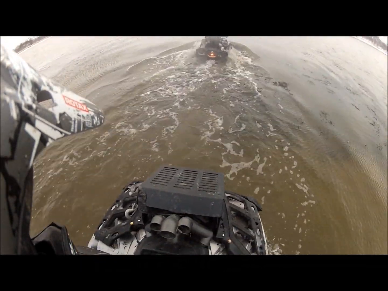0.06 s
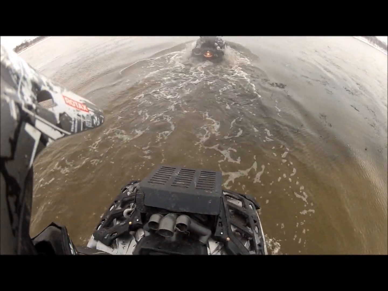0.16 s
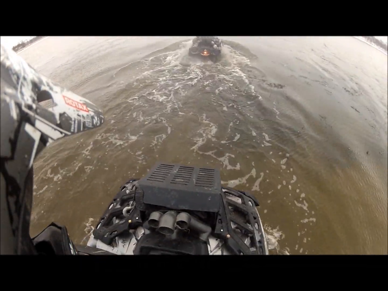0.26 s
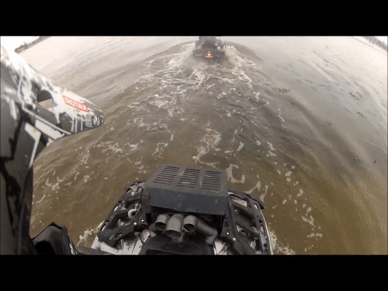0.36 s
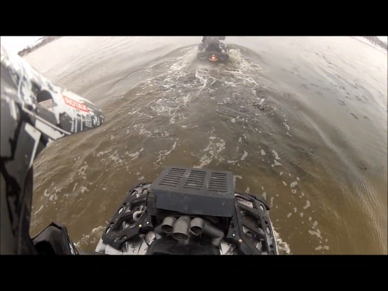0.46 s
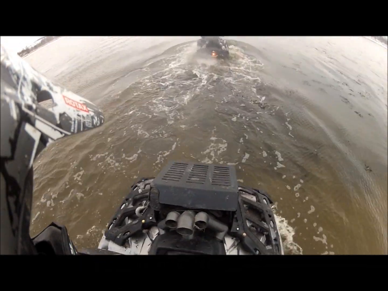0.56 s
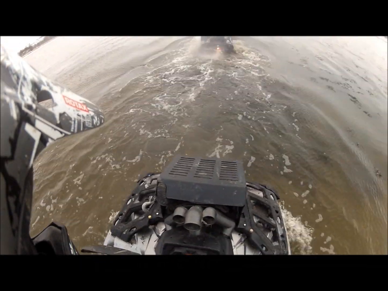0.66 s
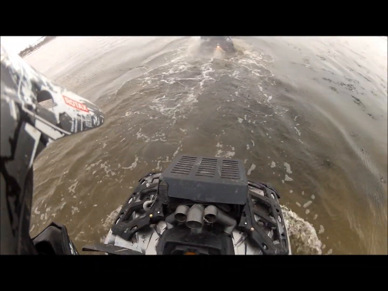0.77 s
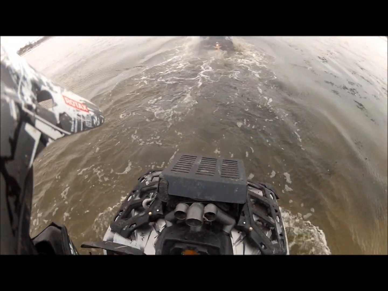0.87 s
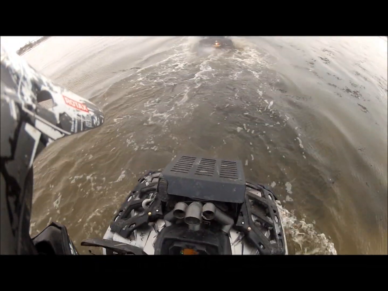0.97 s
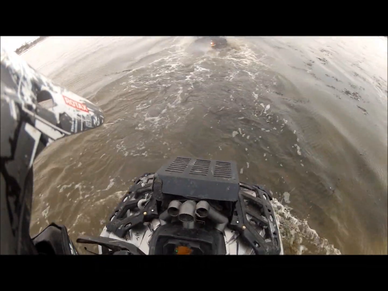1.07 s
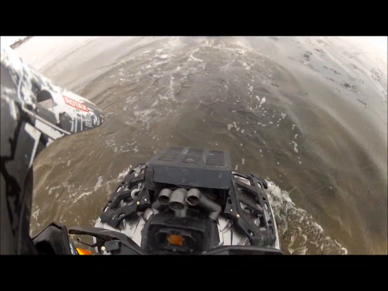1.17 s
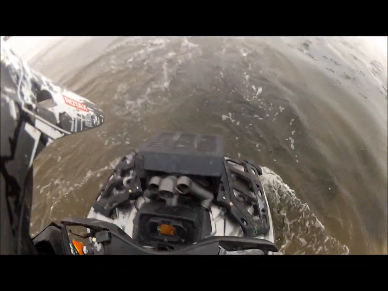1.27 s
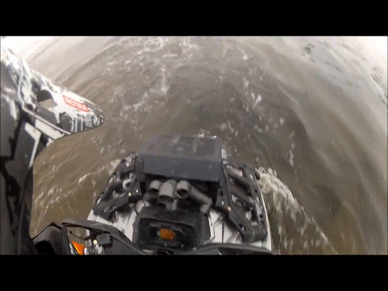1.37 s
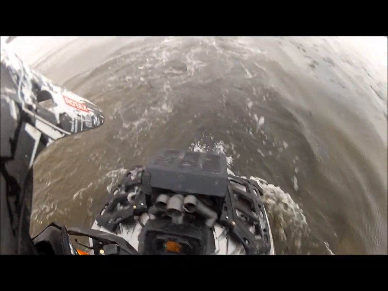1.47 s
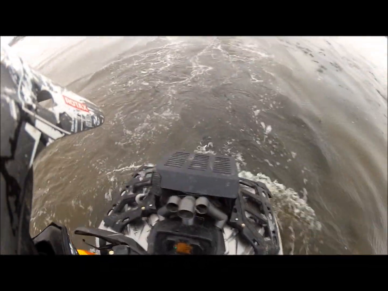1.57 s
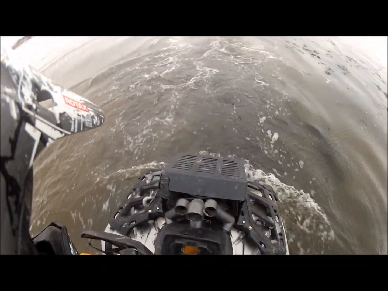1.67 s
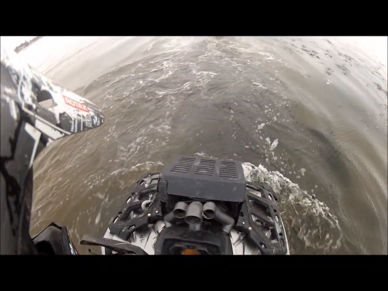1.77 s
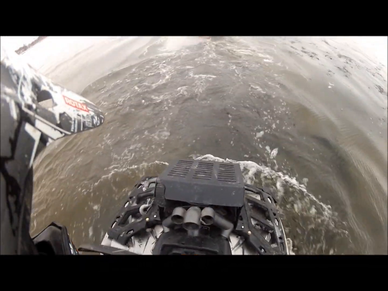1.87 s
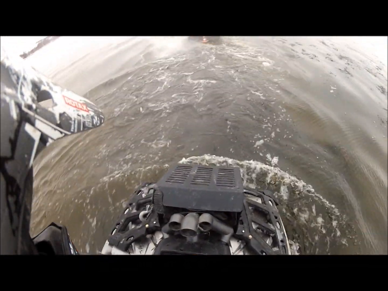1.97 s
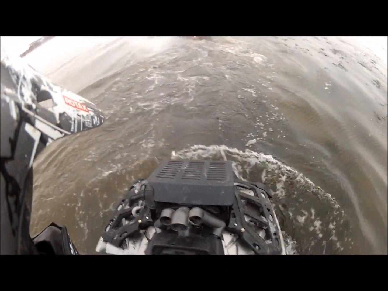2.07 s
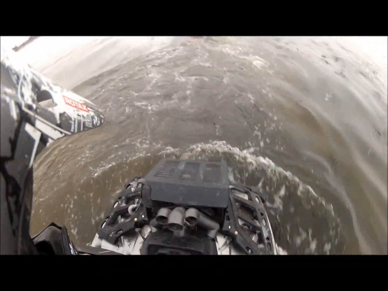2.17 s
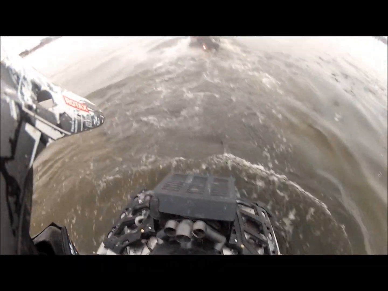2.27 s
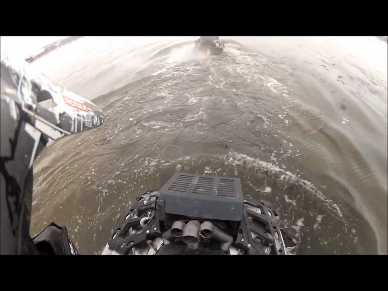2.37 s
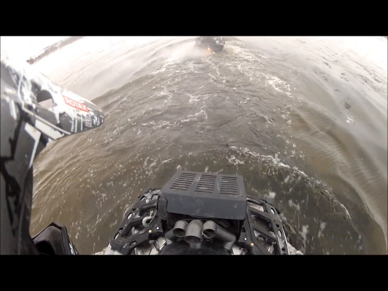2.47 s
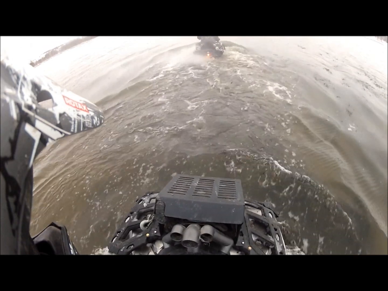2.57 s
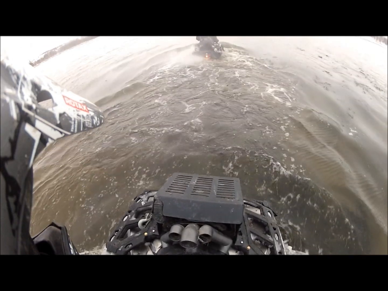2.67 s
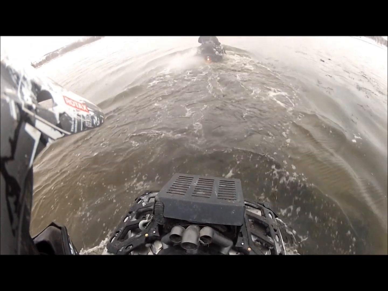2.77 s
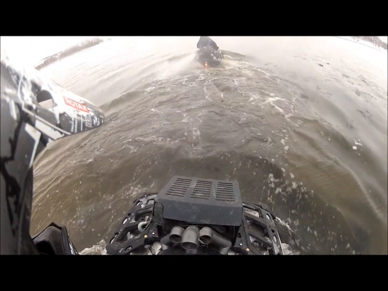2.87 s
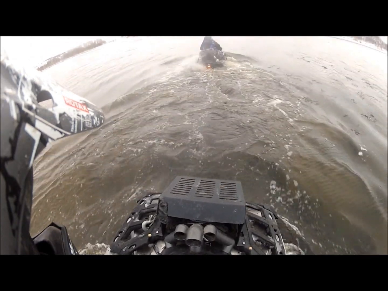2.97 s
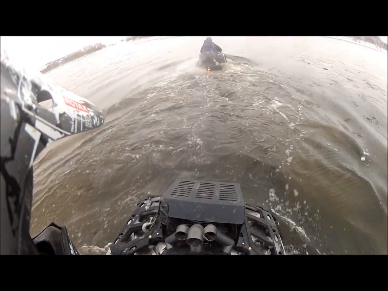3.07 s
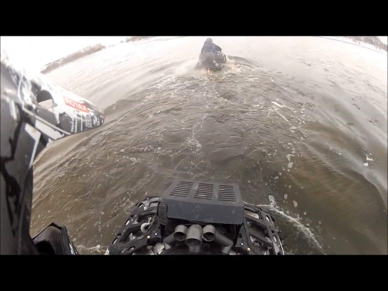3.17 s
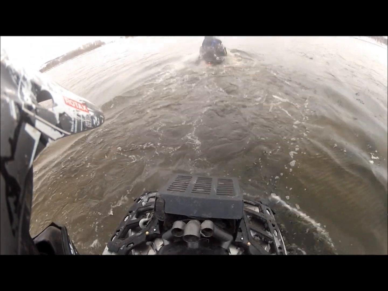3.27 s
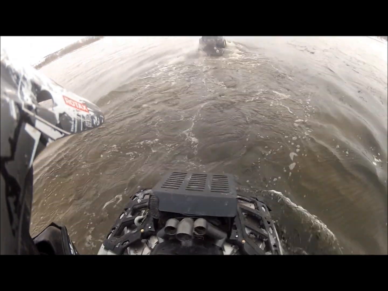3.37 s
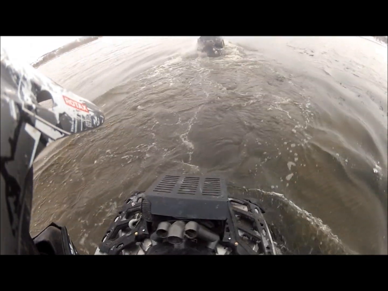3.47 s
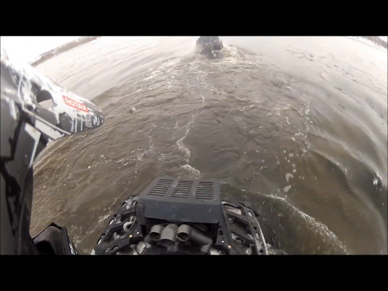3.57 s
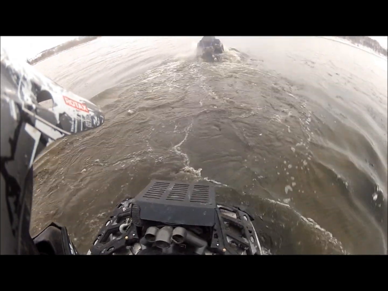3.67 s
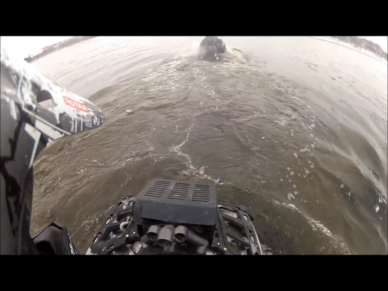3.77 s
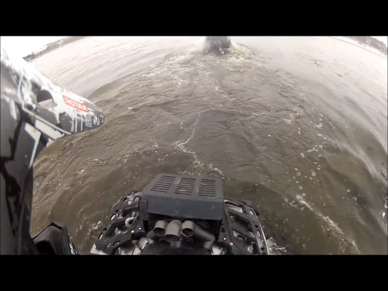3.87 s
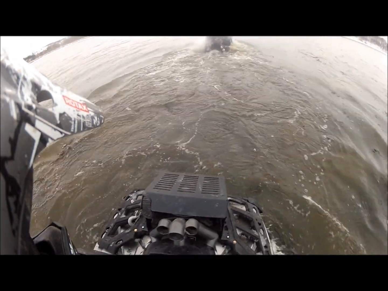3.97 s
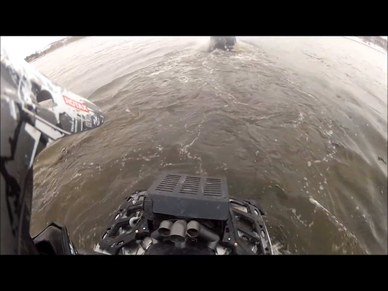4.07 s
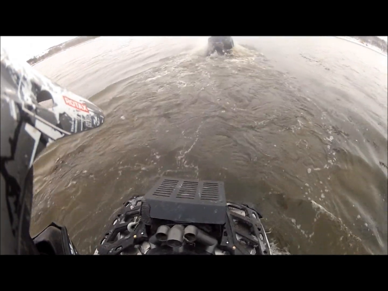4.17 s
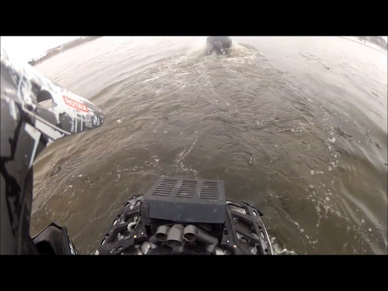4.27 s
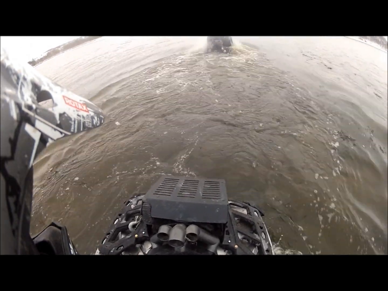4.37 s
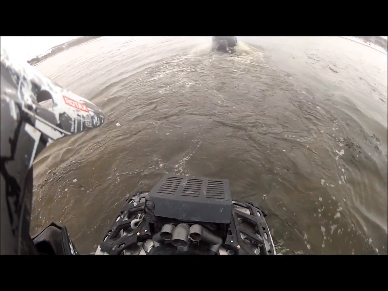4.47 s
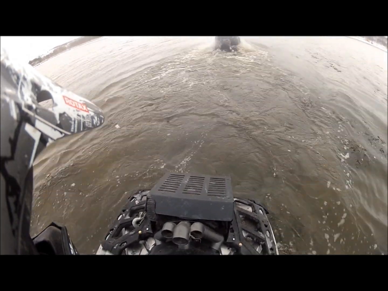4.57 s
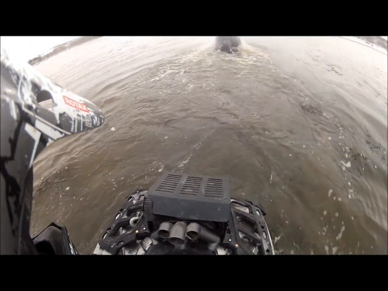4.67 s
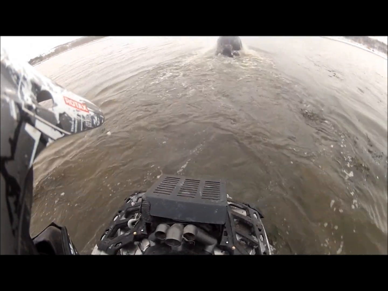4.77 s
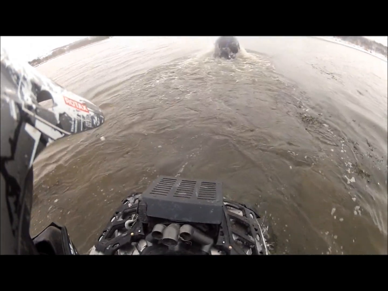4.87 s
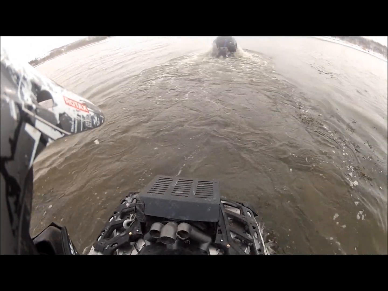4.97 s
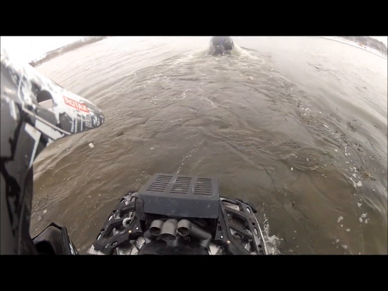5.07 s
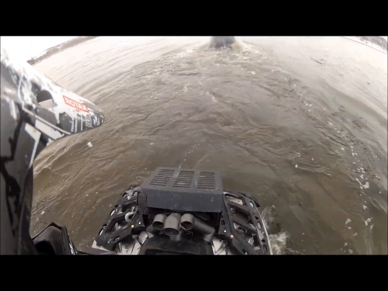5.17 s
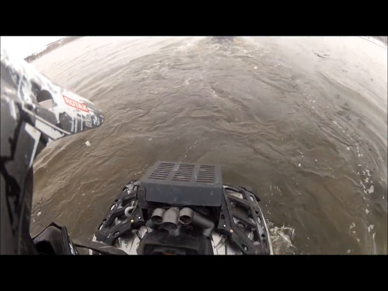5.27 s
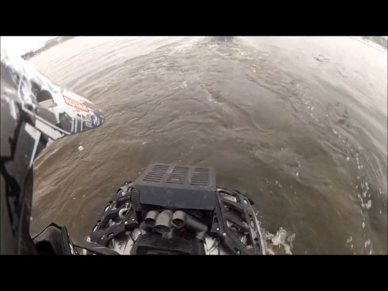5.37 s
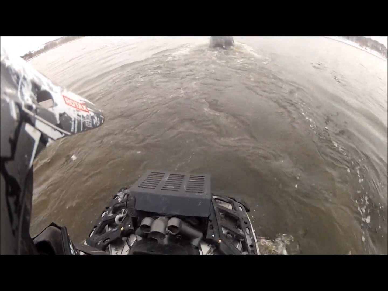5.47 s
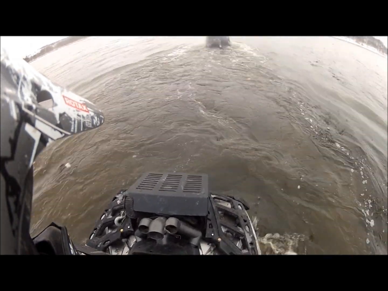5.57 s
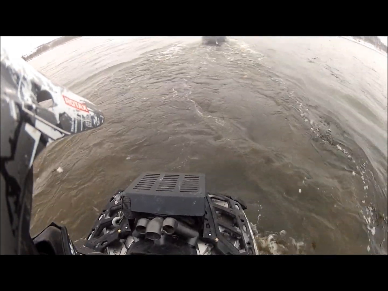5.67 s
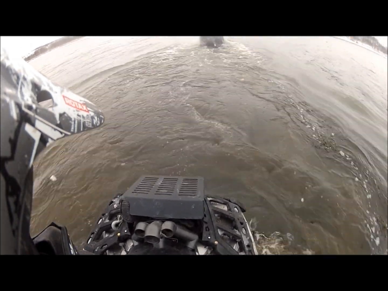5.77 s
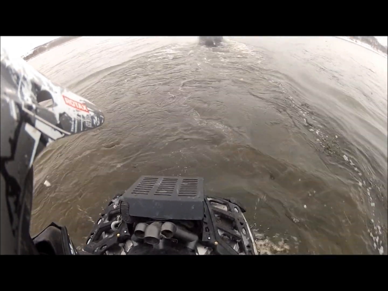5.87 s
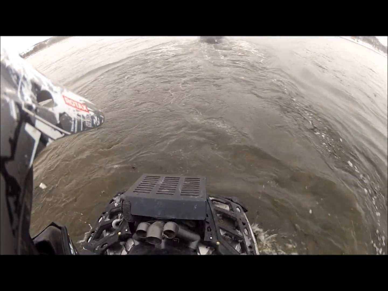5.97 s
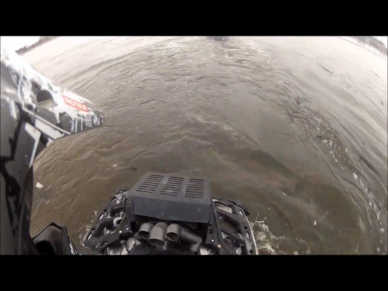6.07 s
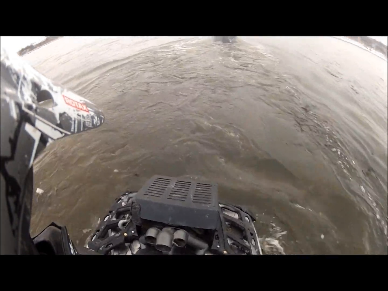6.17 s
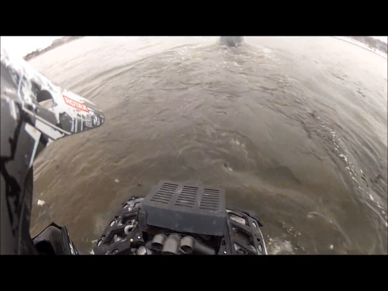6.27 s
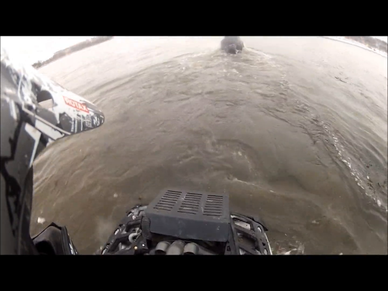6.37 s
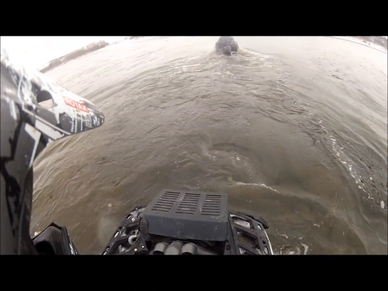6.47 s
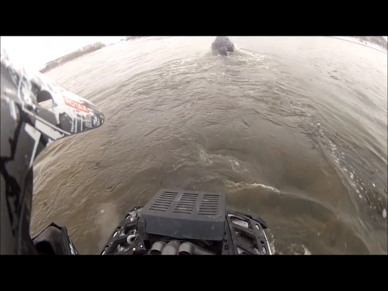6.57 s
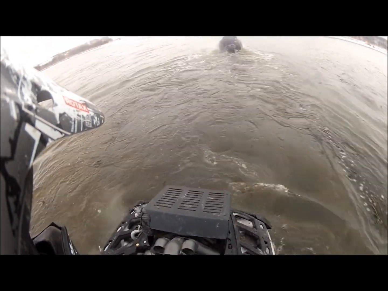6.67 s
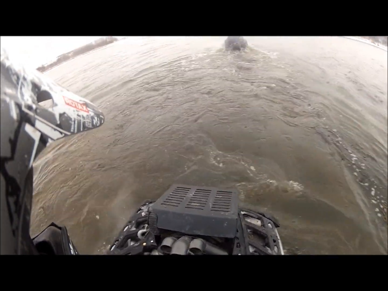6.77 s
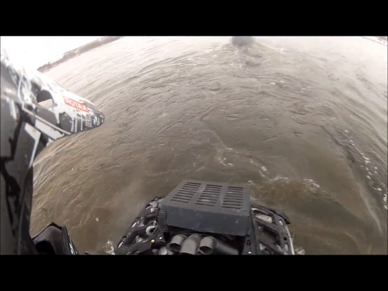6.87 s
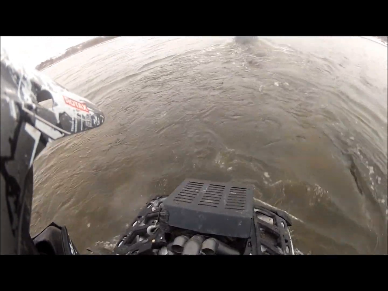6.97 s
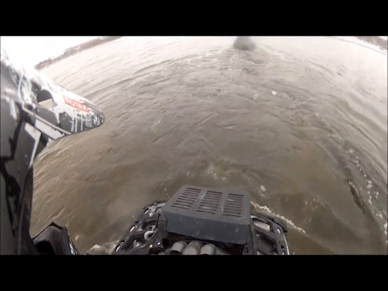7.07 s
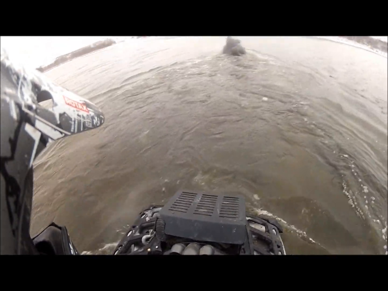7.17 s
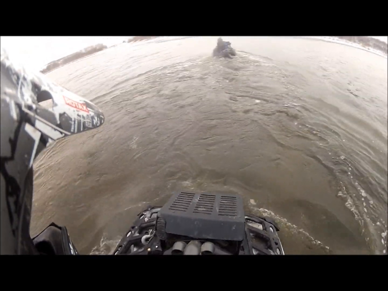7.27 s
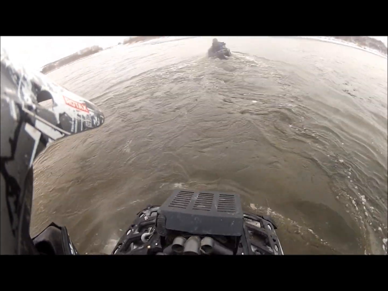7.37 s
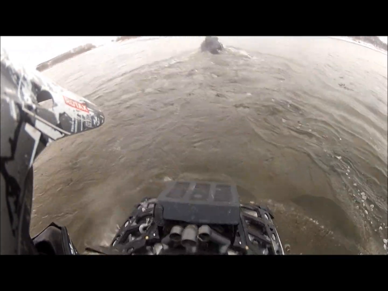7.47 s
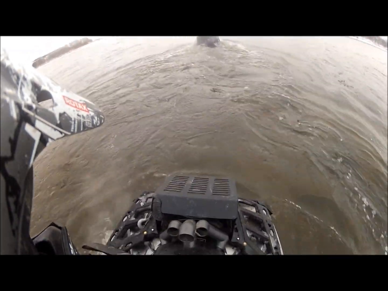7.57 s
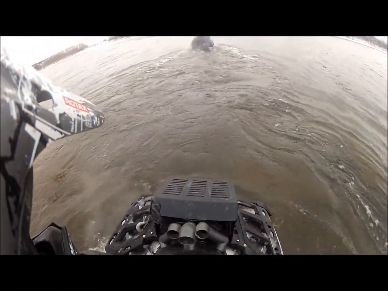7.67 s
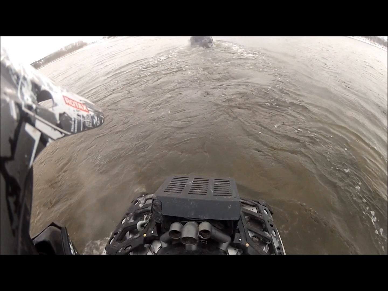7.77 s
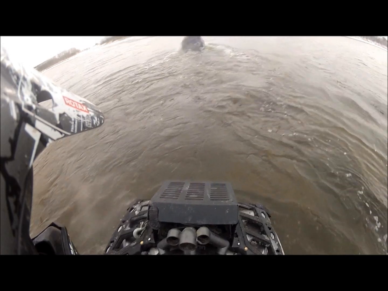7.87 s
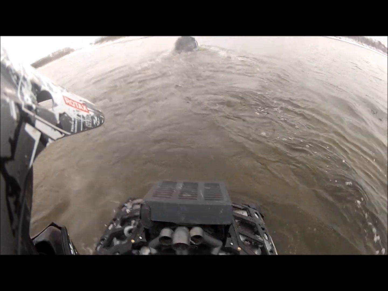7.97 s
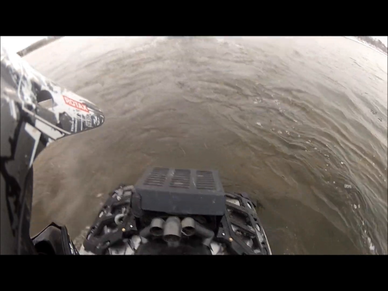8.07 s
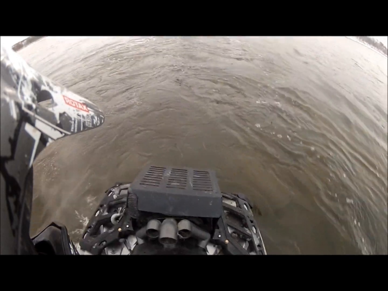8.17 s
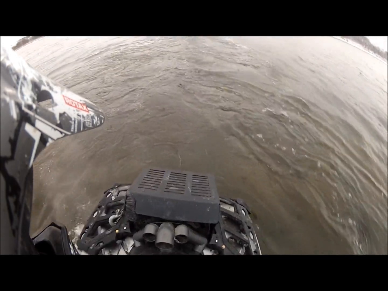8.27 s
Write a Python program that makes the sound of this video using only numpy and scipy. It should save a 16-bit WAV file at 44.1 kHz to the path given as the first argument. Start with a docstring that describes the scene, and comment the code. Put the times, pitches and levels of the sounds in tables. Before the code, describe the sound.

A quad bike engine throbs low and steady through deep water while a second one revs in quick barking surges, then drops out.

```python
"""Two quad bikes wading

Two V-twins cross deep water, heard from a sealed housing. The rider's engine is a low, steady pulse
train that excites resonances in its snorkels and buzzing bodywork. A second bike close by is blipped in
quick surges, its exhaust barking with turbulent gas, then falls silent. Water rumbles underneath,
and coarse sampling mirrors the sound into the treble."""
import sys
import numpy as np
from scipy import signal
from scipy.fft import rfft, irfft
from scipy.io import wavfile
from scipy.ndimage import uniform_filter1d

SR = 44100
rng = np.random.default_rng(int(sys.argv[2]) if len(sys.argv) > 2 else 0)


def transcribe(u):
    """Save the signal u as a 16-bit wav file named by the first command-line argument.

    u: samples, shape (n,) or (channels, n), limited to [-1, 1]; the rate is SR.
    q: integer samples, one column per channel.
    """
    v = np.clip(np.atleast_2d(u).T, -1, 1)
    q = np.round(v * 32767).astype(np.int16)
    wavfile.write(sys.argv[1], SR, q)


N = 367353
TIME = np.arange(N) / SR


def from_db(db):
    """Amplitude ratio of a level in decibels."""
    return 10 ** (np.asarray(db) / 20)

def rms_one(x):
    """Normalisation to unit rms."""
    return x / np.sqrt(np.mean(x ** 2) + 1e-20)

def in_time(rows):
    """Linear interpolation of (seconds, value) rows at every sample."""
    return np.interp(TIME, *np.transpose(rows))

def evened(x, span_s):
    """Division by the running rms removes slow level changes and keeps the pulsing."""
    return x / np.sqrt(uniform_filter1d(x ** 2, int(span_s * SR)) + 1e-12)

def white():
    """White Gaussian noise."""
    return rng.standard_normal(N)

def low_pass(x, hz):
    """Second-order Butterworth low-pass."""
    return signal.sosfilt(signal.butter(2, hz, fs=SR, output="sos"), x)

def resonate(x, modes):
    """Modal superposition: parallel resonances (Hz, bandwidth in Hz, dB) of alternating sign."""
    out = np.zeros(N)
    for k, (hz, width_hz, db) in enumerate(modes):
        r = np.exp(-np.pi * width_hz / SR)
        poles = [1, -2 * r * np.cos(2 * np.pi * hz / SR), r * r]
        zeros = [(1 - r * r) / 2, 0, (r * r - 1) / 2]
        out += (-1) ** k * from_db(db) * signal.lfilter(zeros, poles, x + 1e-18)
    return out

def impulses(cycles, phase, spread_db):
    """Impulse train: a click of random strength each time the cycle passes the given phase."""
    passed = np.diff(np.floor(cycles - phase), prepend=np.floor(cycles[0] - phase)) > 0
    strength = from_db(spread_db * rng.standard_normal(400))
    return passed * strength[np.cumsum(passed) % len(strength)]

def pressure_pulses(clicks, width_s, lean):
    """Convolution turns each click into a peak between two dips; positive lean deepens the later."""
    u = np.arange(-5 * width_s, 5 * width_s, 1 / SR) / width_s
    return signal.fftconvolve(clicks, (1 - u ** 2 - lean * u) * np.exp(-u ** 2 / 2), "same")

def puffs(clicks, decay_s):
    """Each click opens a burst of noise with exponential decay."""
    r = np.exp(-1 / (decay_s * SR))
    return signal.lfilter([1], [1, -r], clicks) * white()

def spells(rows, rise_db_s=91, fall_db_s=53, rest_db=-73.5):
    """Power summation: a gain that climbs to each row's level, holds and sinks back to rest."""
    power = from_db(2 * rest_db)
    for start, end, db in rows:
        drop_db = rise_db_s * np.maximum(start - TIME, 0) + fall_db_s * np.maximum(TIME - end, 0)
        power = power + from_db(2 * (db - drop_db))
    return np.sqrt(power)


# Firings, pipe echoes and intake gulps. Each row: phase in cycles at low speed and at high speed,
# then relative level in dB at low speed and at high speed.
CYCLE_PULSES = [(0, -.012, 0, 0), (.1, .095, -14, -14), (.172, .18, -3, -1), (.255, .262, -10, -13),
                (.375, .36, 0, 0), (.495, .5, -12, -5), (.56, .578, -9, -7), (.635, .68, -3, -6),
                (.72, .73, -5, -20), (.79, .795, -4, -6), (.87, .87, -9, -12)]
def pulse_train(cycles, fast):
    """Periodic excitation: the rider's engine repeats a pulse pattern that shifts with speed."""
    clicks = np.zeros(N)
    for low_phase, high_phase, low_db, high_db in CYCLE_PULSES:
        shifted = cycles - fast * (high_phase - low_phase)
        gain = from_db(low_db + fast * (high_db - low_db))
        clicks += gain * impulses(shifted, low_phase, spread_db=1.66)
    return clicks

# Snorkel resonance. Each row: frequency in Hz, bandwidth in Hz, relative gain in dB.
SNORKEL_MODES = [(86, 150, 17.5)]
# Airbox boom. Each row: multiple of the cycle rate, relative level in dB at low and at high speed.
AIRBOX_ORDERS = [(2, -29, -28.5), (3, -24.5, -14), (5, -0.5, 2), (6, -23, -15), (8, -14.5, -20)]
# Strength of the throb. Each row: time in seconds, level in dB.
THROB_LEVEL = [(0, -32), (3.3, -29.5), (4.7, -29.5), (5.3, -29), (5.8, -30.5), (6.3, -28), (8, -28.5)]
def throb(cycles, fast, clicks):
    """Air-column resonance: pulses boom in the snorkels, and the airbox adds low harmonics."""
    pressure = pressure_pulses(clicks, width_s=.00145, lean=.8)
    boom = evened(pressure + 2.8 * resonate(pressure, SNORKEL_MODES), span_s=.27)
    for order, low_db, high_db in AIRBOX_ORDERS:
        boom += from_db(low_db + fast * (high_db - low_db)) * np.cos(2 * np.pi * order * (cycles - .025))
    firings = impulses(cycles, .988, spread_db=1.5) + impulses(cycles, .36, spread_db=1.5)
    edge = pressure_pulses(firings * fast ** 2, width_s=.00078, lean=.1)   # firings sharpen at speed
    return from_db(in_time(THROB_LEVEL)) * (boom + from_db(-26) * rms_one(edge))

# Bodywork resonances. Each row: frequency in Hz, bandwidth in Hz, relative gain in dB.
BODY_MODES = [(655, 16, -7), (1383, 50, 7), (1632, 20, 5.5), (1890, 50, 2), (2550, 97, -7.5),
              (3505, 91, -3), (5270, 87, -26)]
# Valve gear noise. Each row: frequency in Hz, relative spectral density in dB.
VALVE_SPECTRUM = [(210, -27), (350, -5.5), (505, -19.5), (695, -10), (1130, -18.5), (1380, -13),
                  (2060, -12.5), (2670, -8), (4500, -26), (5060, -22), (5900, -30), (7670, -57.5),
                  (13000, -120)]
# Strength of both together. Each row: time in seconds, level in dB.
CLATTER_ENVELOPE = [(0, -43.5), (2.8, -44), (3.2, -46), (4.0, -46.5), (4.4, -46), (5.4, -45.5),
                    (6.0, -48.5), (6.2, -46), (7.0, -46), (8, -45.5)]
def clatter(shaking):
    """Forced vibration: the bodywork rings in its modes over the broadband noise of the valve gear."""
    hz, db = np.transpose(VALVE_SPECTRUM)
    bins_hz = np.maximum(np.arange(N // 2 + 1) * SR / N, 1)
    spectrum = from_db(np.interp(np.log(bins_hz), np.log(hz), db))
    valves = rms_one(irfft(rfft(white()) * spectrum, N))
    body = rms_one(resonate(shaking, BODY_MODES))
    return from_db(in_time(CLATTER_ENVELOPE)) * rms_one(body + 1.07 * valves)

# Water and wind against the housing. Each row: time in seconds, level in dB.
RUMBLE_LEVEL = [(0, -57), (1.2, -52), (2.3, -43.5), (3.6, -44), (4.1, -52), (4.5, -37), (5.2, -50),
                (5.8, -45), (8, -51.5)]
def water():
    """Flow noise in three bands: rumble on the housing, slosh and the faint wash of the bow wave."""
    rumble = rms_one(resonate(resonate(white(), [(34, 12, 0)]), [(34, 14, 0)]))
    slosh = rms_one(resonate(resonate(white(), [(141.4, 110, 0)]), [(141.4, 110, 0)]))
    wash = rms_one(low_pass(white(), hz=900))
    return from_db(in_time(RUMBLE_LEVEL)) * rumble + from_db(-51.5) * slosh + from_db(-64.5) * wash

# The second bike's pipe tones. Each row: multiple of the cycle rate, relative level in dB.
DRONE_ORDERS = [(2, -5.5), (3, -11), (4, 0), (6, 3.5), (7, 1.5), (8, -19), (9, -23), (10, -23), (13, -20.5),
                (18, -24)]
# Strength of the drone. Each row: time in seconds, level in dB.
DRONE_ENVELOPE = [(0, -33), (.3, -23.5), (.52, -35), (.68, -26.5), (.78, -41.5), (.9, -35), (1.05, -25.5),
                  (1.28, -30.5), (1.45, -22.5), (1.52, -34), (1.7, -27.5), (1.82, -22.5), (2.02, -27),
                  (2.1, -35), (2.6, -31), (2.7, -40), (3.4, -39), (3.5, -76)]
def pipe_drone(cycles, flutter_db=2.5):
    """Harmonic series: between blips the pipe drones on a few orders, each fluttering in level."""
    flutter = [flutter_db * rms_one(low_pass(white(), hz=11)) for _ in range(3)]
    drone = sum(from_db(db + flutter[k % 3]) * np.cos(2 * np.pi * order * cycles + order ** 2)
                for k, (order, db) in enumerate(DRONE_ORDERS))
    return from_db(in_time(DRONE_ENVELOPE)) * rms_one(drone)

# Muffler resonance. Each row: frequency in Hz, bandwidth in Hz, relative gain in dB.
MUFFLER_MODES = [(255, 110, 0)]
def exhaust_thump(cycles, cycle_hz, firings, rear):
    """Cavity resonance: the muffler rings after each pulse; under load the rear pulse sharpens."""
    load = np.interp(cycle_hz, [38.8, 40.5], [0, .93])
    pressure = pressure_pulses(firings, width_s=.00095, lean=0)
    pressure += pressure_pulses(rear * load, width_s=.00067, lean=-.31)
    boom = .085 * (1 + 1.9 * load) * np.cos(4 * np.pi * cycles)   # one period per crank turn
    return pressure + .6 * resonate(pressure, MUFFLER_MODES) + boom

# Bands of exhaust gas noise. Each row: frequency in Hz, bandwidth in Hz, relative gain in dB.
RASP_MODES = [(534, 244, -9.5), (698, 40, -2.6), (833, 66, -6.5), (988, 171, -9)]
CRACK_MODES = [(1294, 55, 11.5), (1544, 89, 4)]
CRACKLE_MODES = [(2180, 710, 5), (2398, 1480, -0.5), (3370, 124, 3.5)]
SIZZLE_MODES = [(4994, 250, 0.1)]
def gas_jet(firings):
    """Turbulence: gas spits with each firing and excites four sets of resonances."""
    jet = np.roll(firings, -int(.0004 * SR))   # starts with the pressure front, ahead of the peak
    rasp = resonate(16 * jet + puffs(jet, decay_s=.004) + .08 * white(), RASP_MODES)
    crack = resonate(6 * jet + puffs(jet, decay_s=.0035) + .05 * white(), CRACK_MODES)
    crackle = resonate(4 * jet + puffs(jet, decay_s=.0035) + .05 * white(), CRACKLE_MODES)
    sizzle = resonate(puffs(jet, decay_s=.0096), SIZZLE_MODES)
    return rasp, crack, crackle, sizzle

# Open throttle. Each row: start and end in seconds, then thump, rasp, crack, crackle and sizzle in dB.
THROTTLE_BLIPS = [(0.146, 0.208, -23, -38.5, -42, -33, -54),
                  (0.451, 0.575, -17.5, -29, -35.5, -28.5, -47.5),
                  (0.855, 0.976, -20, -30.5, -36, -35.5, -56.5), (1.24, 1.342, -20, -30.5, -36, -36.5, -44),
                  (1.657, 1.763, -24.5, -32.5, -32, -38, -52.5),
                  (2.173, 2.195, -25, -37, -30, -41.5, -51.5),
                  (2.259, 2.359, -19.5, -29.5, -35.5, -36, -48),
                  (2.454, 2.662, -25.5, -27.5, -37.5, -45, -58.5),
                  (2.758, 3.013, -23, -31.5, -41, -48, -60.5), (3.102, 3.076, -24, -33.5, -62, -68, -78.5),
                  (3.24, 3.367, -31.5, -40, -54, -56, -88), (3.87, 3.95, -44.5, -54, -66, -54, -71)]
# Those five layers in order. Each row: factor on the rise and fall slopes, coasting level in dB.
EXHAUST_LAYERS = [(1., -47), (1.1, -51), (1.8, -58), (1.6, -58), (1.4, -70)]
# Single firings that bark out. Each row: time in seconds, change of the gas noise in dB.
BARK_ACCENTS = [(0.112, 8.5), (.146, 3), (.569, -1), (0.595, 5.5), (0.88, 7.5), (1.204, 6), (1.623, 4.5),
                (1.713, 4), (2.132, 9.5), (2.165, 4.5), (2.23, 7.5), (2.652, 1), (2.995, 4)]
# Misses of the rear cylinder as the throttle opens. Each entry: time in seconds.
MISFIRE_TIMES = [.127, .861, 2.147, 2.179, 2.21]
def throttle(layers, bark_s=.009, miss_s=.0075, miss_db=-12):
    """Amplitude modulation: exhaust layers swell with each blip, jump at barks and dip at misfires."""
    bark_db = sum(db * ((TIME > s - .003) & (TIME < s + bark_s)) for s, db in BARK_ACCENTS)
    missing = sum((TIME > s - .004) & (TIME < s + miss_s) for s in MISFIRE_TIMES)
    gap_db = miss_db * uniform_filter1d(missing.astype(float), size=90)
    fade_db = 52 * np.maximum(TIME - 3.2, 0)   # the coasting level dies away from 3.2 s
    exhaust = np.zeros(N)
    for k, (slope, coast_db) in enumerate(EXHAUST_LAYERS):
        blips = np.array(THROTTLE_BLIPS)[:, [0, 1, 2 + k]]
        surge = spells(blips, rise_db_s=140.5 * slope, fall_db_s=165 * slope, rest_db=coast_db - fade_db)
        bark_share = .15 if k == 0 else 1   # the thump barely barks
        exhaust += surge * from_db(gap_db + bark_share * bark_db) * evened(layers[k], span_s=.17)
    return exhaust

# The second bike's speed. Each row: time in seconds, four-stroke cycles per second.
SECOND_SPEED = [(0.0, 29.55), (0.24, 34.52), (0.6, 37.41), (0.84, 33.99), (1.02, 38.1), (1.2, 35.88),
                (1.38, 38.61), (1.5, 33.03), (1.68, 33.82), (1.8, 39.21), (2.04, 32.99), (2.22, 31.74),
                (2.34, 36.39), (2.4, 40.27), (2.46, 37.63), (2.52, 41.92), (2.64, 40.66), (2.76, 42.31),
                (2.82, 44.44), (3.0, 45.47), (3.24, 40.63), (3.36, 42.16), (3.42, 41.2), (4.2, 40.09)]
# Cylinder balance. Each row: cycles per second, level of the rear against the front in dB.
REAR_BALANCE = [(32, -3.5), (38.5, -3), (40, 2), (41.5, 0.5)]
def second_bike():
    """Uneven firing: two cylinders, 0.385 of a cycle apart, drive the exhaust of a V-twin."""
    cycle_hz = in_time(SECOND_SPEED)
    cycles = -2.551 + np.cumsum(cycle_hz) / SR
    rear_gain = from_db(np.interp(cycle_hz, *np.transpose(REAR_BALANCE)))
    rear = rear_gain * impulses(cycles, .385, spread_db=.75)
    firings = impulses(cycles, 0, spread_db=2.5) + rear
    thump = exhaust_thump(cycles, cycle_hz, firings, rear)
    return pipe_drone(cycles) + throttle([thump, *gas_jet(firings)])

# Buzzing of the rider's rack. Each row: start in seconds, end in seconds, level in dB.
RACK_BUZZES = [(.7, 1.15, -46.5), (1.8, 2.02, -47), (2.7, 2.84, -49.5), (4.7, 5.42, -51),
               (6.2, 6.42, -50.5), (6.76, 7.2, -46.5), (7.35, 7.45, -57), (7.7, 7.9, -50)]
def rack_buzz(cycles):
    """Impact excitation: knocked once a cycle, the loose rack rings on one note."""
    knocks = impulses(cycles, .2, spread_db=2.5)
    ring = resonate(knocks + .06 * puffs(knocks, decay_s=.012), [(1607, 22, 0)])
    return spells(RACK_BUZZES) * rms_one(ring)

# Singing of a panel. Each row: start in seconds, end in seconds, level in dB.
PANEL_TONES = [(1.9, 2.1, -74), (6.17, 6.45, -57), (6.8, 7.24, -47.5)]
def panel_tone(shaking):
    """Narrow resonance: the panel draws one sustained note from the engine's shaking."""
    ring = resonate(resonate(shaking, [(2572, 35, 0)]), [(2572, 50, 0)])
    return spells(PANEL_TONES) * rms_one(ring)

# Rattling of that panel. Each row: start in seconds, end in seconds, level in dB.
PANEL_RATTLES = [(2.8, 3.7, -48), (6.75, 7.35, -51)]
def panel_rattle(cycles, shaking):
    """Broad resonance: uneven bursts of noise, one a cycle, excite the loose panel."""
    bursts = puffs(impulses(cycles, .76, spread_db=5.5), decay_s=.031)
    ring = resonate(resonate(bursts + .11 * shaking, [(2565, 168, 0)]), [(2570, 200, 0)])
    return spells(PANEL_RATTLES) * rms_one(ring)

# The speed of the rider's engine. Each row: time in seconds, four-stroke cycles per second.
RIDER_SPEED = [(0.0, 21.55), (0.3, 20.95), (0.45, 21.68), (1.2, 18.65), (2.25, 17.97), (2.55, 19.71),
               (3.0, 17.41), (3.8, 16.72), (4.0, 16.07), (4.2, 17.18), (4.5, 17.13), (4.6, 18.3),
               (5.1, 18.64), (5.3, 17.67), (5.6, 18.27), (6.0, 15.15), (6.2, 19.09), (6.5, 19.79),
               (6.8, 21.13), (7.3, 21.21), (7.5, 19.86), (8.0, 19.8)]
def rider_bike():
    """Common excitation: one crank times the throb and the shaking of the bodywork and loose parts."""
    cycle_hz = in_time(RIDER_SPEED)
    cycles = -.429 + np.cumsum(cycle_hz) / SR
    fast = np.interp(cycle_hz, [17.5, 20], [0, 1])   # blend from the low-speed to the high-speed pattern
    clicks = pulse_train(cycles, fast)
    engine = throb(cycles, fast, clicks)
    shaking = puffs(clicks, decay_s=.006) + .2 * white()
    return (engine + clatter(shaking)
            + rack_buzz(cycles) + panel_tone(shaking) + panel_rattle(cycles, shaking))

def scene():
    """Superposition of both bikes and the water in one channel."""
    return (rider_bike() + second_bike() + water())[None]

def record(dry):
    """Spectral imaging: holding slow samples mirrors the sound into the treble; it stops abruptly."""
    sampling_hz, cutoff_hz, stop_s = 12000, 15875, 7.9493
    samples = signal.resample_poly(dry, sampling_hz, SR, axis=1)
    steps = np.repeat(samples, 4, axis=1)
    held = signal.resample_poly(steps, SR, 4 * sampling_hz, axis=1)
    held = np.pad(held, ((0, 0), (0, 8)))[:, :N] * (TIME < stop_s)
    return signal.sosfilt(signal.cheby2(12, 42, cutoff_hz, fs=SR, output="sos"), held)


dry = scene()
out = record(dry)
transcribe(out)
```